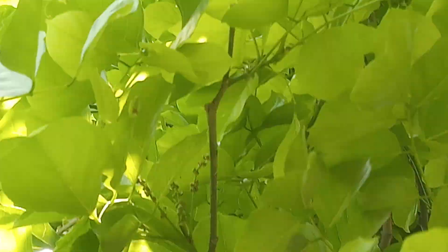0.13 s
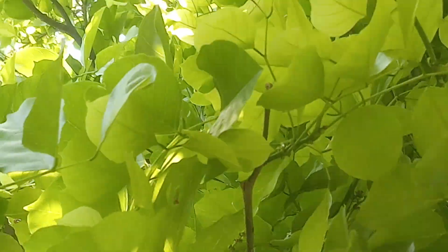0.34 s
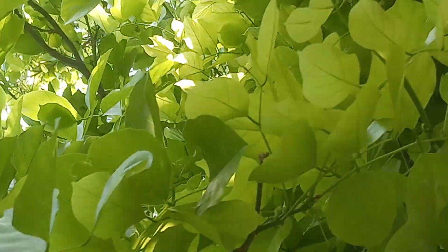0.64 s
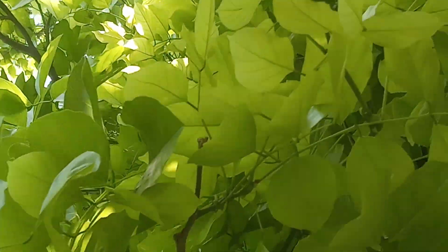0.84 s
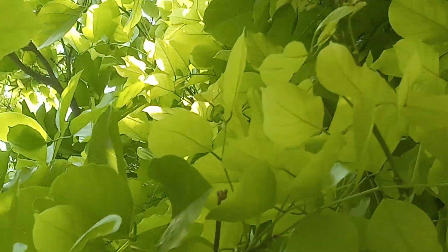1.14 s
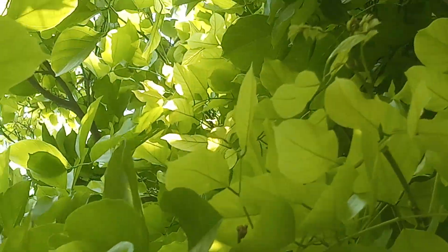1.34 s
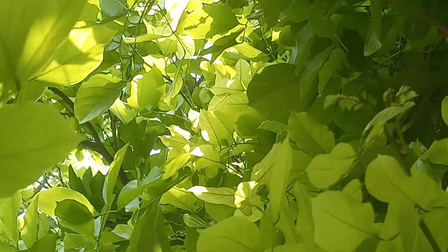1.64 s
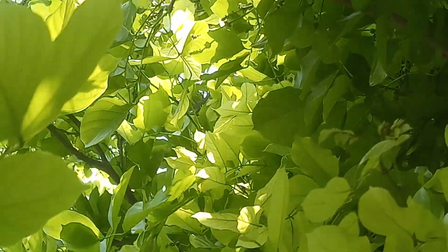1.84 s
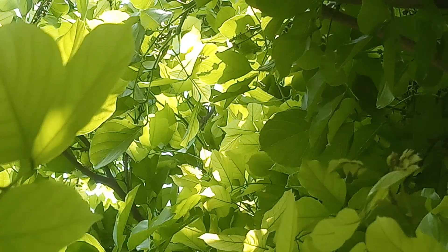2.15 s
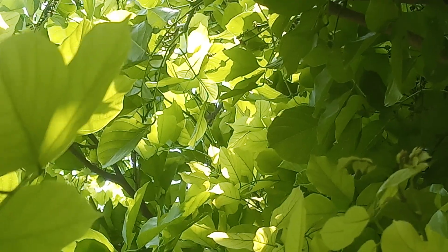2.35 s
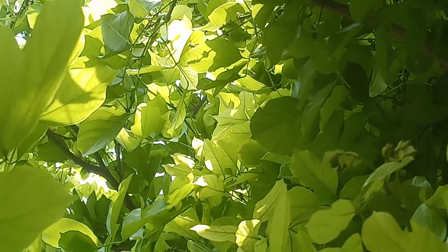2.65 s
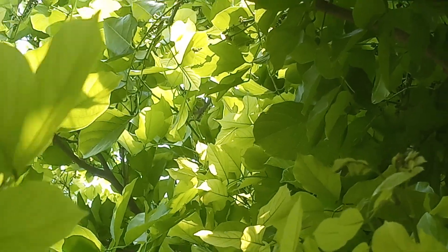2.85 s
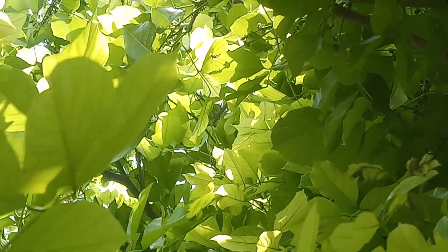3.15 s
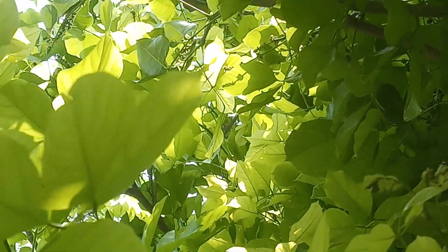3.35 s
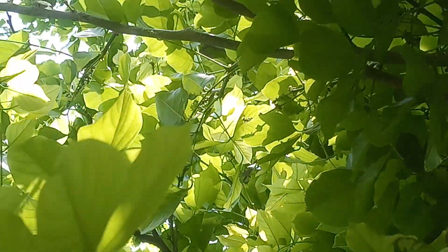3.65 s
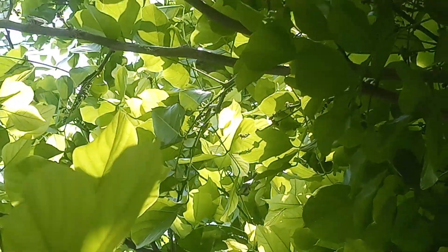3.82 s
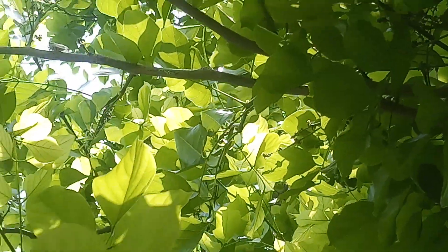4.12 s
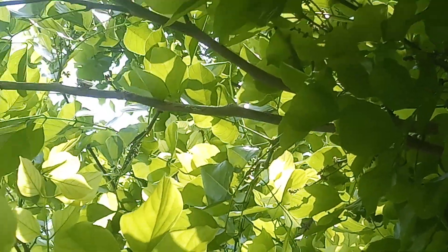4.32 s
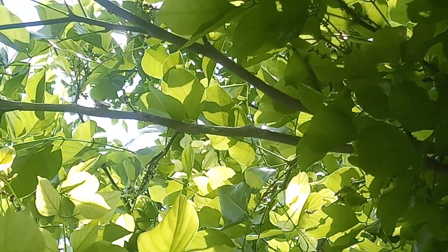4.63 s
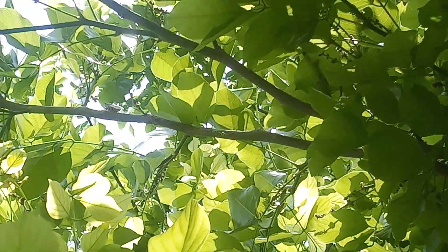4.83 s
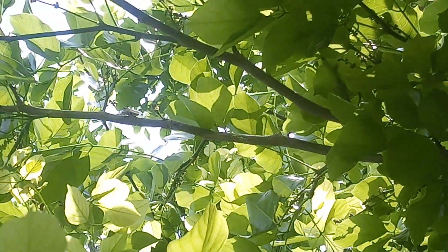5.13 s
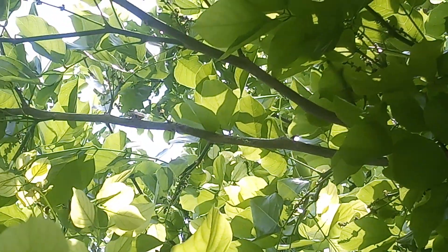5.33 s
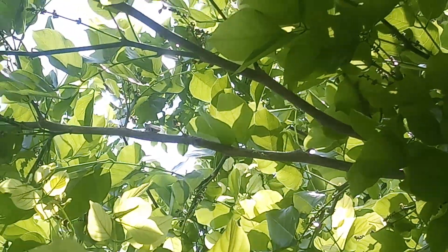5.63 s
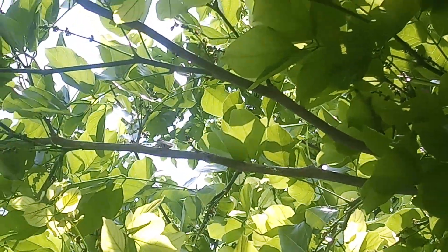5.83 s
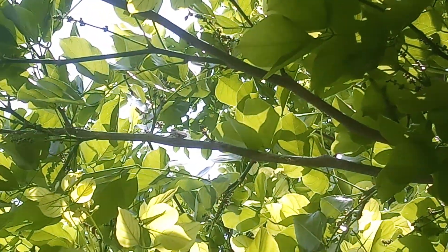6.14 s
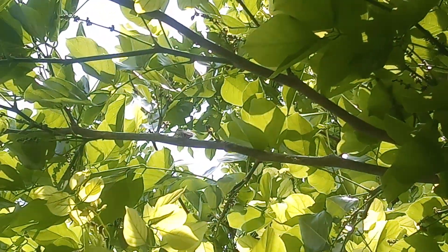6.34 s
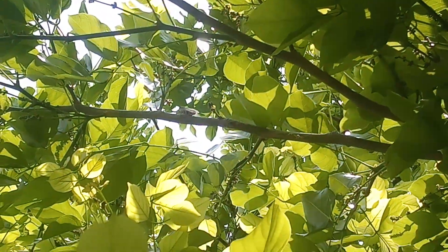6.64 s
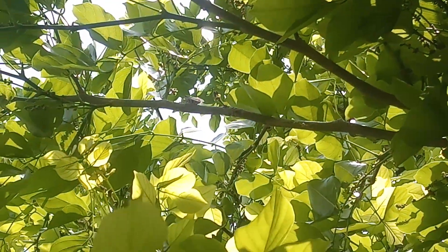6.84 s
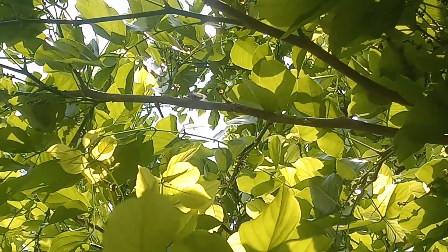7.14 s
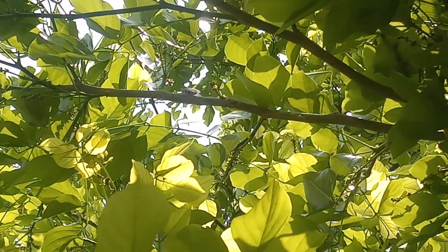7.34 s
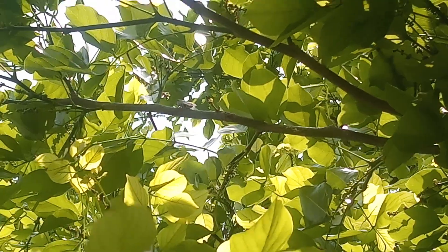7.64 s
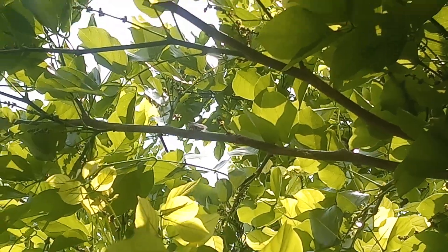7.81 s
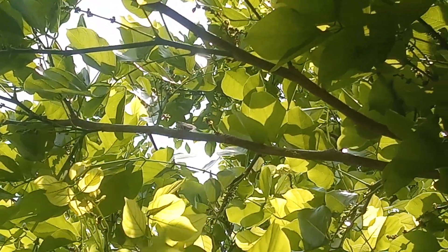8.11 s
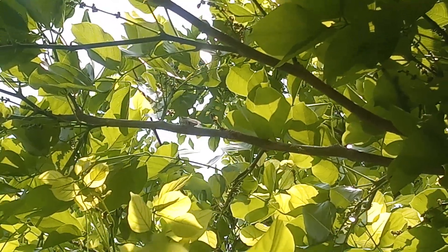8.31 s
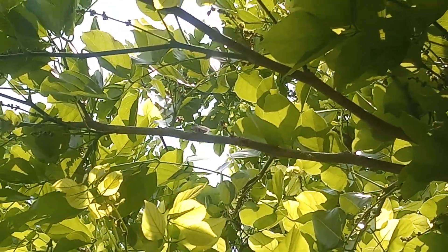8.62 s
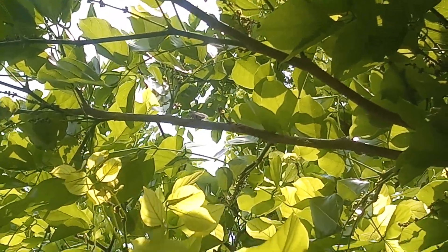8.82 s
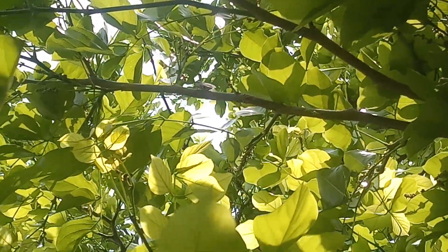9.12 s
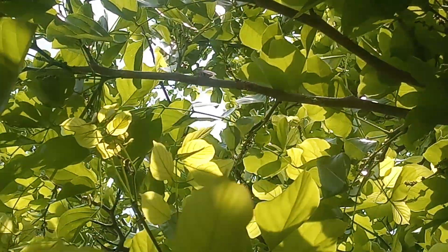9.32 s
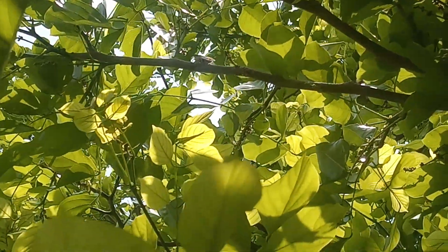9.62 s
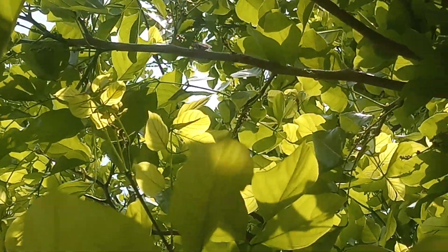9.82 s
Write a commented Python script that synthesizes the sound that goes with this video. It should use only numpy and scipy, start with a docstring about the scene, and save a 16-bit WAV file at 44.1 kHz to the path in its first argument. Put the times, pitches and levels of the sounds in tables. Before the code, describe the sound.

Steady, high-pitched cicada buzz from leafy branches overhead, with a few early gusts bumping the microphone and light ticking among the leaves.

```python
"""A shrill cicada drones in a leafy tree overhead, and early gusts buffet the microphone.
Its tymbals buckle about 208 times a second, a little faster in each surge of effort, and ring its hollow
abdomen. Leaves shade and scatter the sound; the treble opens as the hand-held camera turns to the crown.
Close by are dry ticks, snaps and handling knocks; far across the garden, a faint bird, tones and a hum."""
import sys
import numpy as np
from scipy import signal
from scipy.fft import rfft, irfft, next_fast_len
from scipy.io import wavfile
from scipy.ndimage import uniform_filter1d, map_coordinates

SR = 44100
rng = np.random.default_rng(int(sys.argv[2]) if len(sys.argv) > 2 else 0)


def dump(signal):
    """Clip the signal to [-1, 1] and save it as 16-bit WAV at the path in sys.argv[1]."""
    limited = np.clip(np.atleast_2d(signal).T, -1, 1)
    pcm = np.round(limited * 32767).astype(np.int16)
    wavfile.write(sys.argv[1], SR, pcm)


N = 439677
TIME = np.arange(N) / SR

# Levels are relative within each table.
# still garden air: f/Hz, level/dB
AIR_SPECTRUM = [(15, -57), (25, -28.5), (45, -10), (92, 2.5), (125, -6.5), (189, -2), (263, -7), (427, -6),
                (1600, -13), (2170, -13), (2540, -13), (2830, -11.5), (4800, -12), (6240, -5.5),
                (10600, -120)]
# soft swishes: t/s, hold/s, level/dB
SWISH_SWELLS = [(3.06, 0.49, -42), (3.7, 0.043, -40.5)]
# colour of a swish: f/Hz, level/dB
SWISH_SPECTRUM = [(100, -20), (230, -3.5), (350, -3), (500, -7), (800, -14), (1600, -34), (4000, -53)]
# faint far tones: t/s, length/s, start f/Hz, end f/Hz, level/dB
FAR_TONES = [(1.8, 0.19, 512, 535, -45), (2.42, 0.31, 509, 500, -49), (2.9, 0.28, 678, 680, -50),
             (3.08, 0.23, 335, 338, -45.5), (6.4, 0.27, 693, 695, -52), (8.35, 0.16, 437, 450, -47.5),
             (8.45, .45, 715, 755, -52)]
# a distant bird: t/s, length/s, start f/Hz, end f/Hz, level/dB
BIRD_CALLS = [(1.41, .13, 4240, 5170, -42), (1.69, 0.15, 4300, 5340, -39), (1.96, 0.2, 4300, 5430, -36),
              (2.12, 0.09, 2390, 2400, -38), (2.21, .13, 4260, 5300, -36), (2.45, 0.17, 4280, 5200, -40),
              (2.68, .12, 4380, 5160, -38)]
# pitches of the small crackle: f/Hz, level/dB
CRACKLE_PITCHES = [(1150, -8.5), (2200, -2.5), (2950, -1.5), (4000, -5.5)]
# loudness of the crackle: t/s, level/dB
CRACKLE_LEVEL = [(0, -46), (1.5, -49), (3.5, -46.5), (5.4, -49), (8.1, -47), (9.9, -52)]
# dry ticks among the leaves: t/s, level/dB, f/Hz
DRY_TICKS = [(0.5616, -25, 2920), (0.628, -25, 2620), (0.7607, -26, 4000), (0.922, -25, 2210),
             (1.25, -32, 2250), (1.72, -29.5, 2550), (2.283, -27, 3100), (2.6179, -30, 2800),
             (3.198, -28, 2830), (3.5495, -24, 2900), (3.9878, -32, 3060), (5.0203, -29.5, 3080),
             (5.1553, -30.5, 3110), (5.254, -24.5, 2520), (5.4291, -30, 3170), (5.692, -29, 2220),
             (5.8356, -30, 3180), (6.0296, -27.5, 2880), (6.223, -27, 2830), (6.364, -25, 2930),
             (6.543, -25, 3300), (6.6275, -23.5, 3430), (6.9631, -27, 2840), (7.046, -24, 2200),
             (7.393, -30, 3190), (7.9483, -26.5, 3020), (8.9054, -26.5, 2850), (9.138, -28, 3960),
             (9.1788, -28, 2300), (9.7058, -30, 3220)]
# sharp snaps: t/s, level/dB, low f/Hz, high f/Hz
SHARP_SNAPS = [(.563, -25, 2500, 6000), (1.251, -22, 1500, 13000), (2.262, -24, 11000, 14500),
               (6.366, -24, 2000, 5500), (6.628, -23, 2500, 5500), (7.449, -19, 4500, 14000),
               (9.178, -18.5, 1970, 6000), (9.362, -26, 4400, 5800)]
# handling noise at the microphone: t/s, level/dB
HANDLING_KNOCKS = [(4.812, -30), (5.254, -35), (7.38, -29), (7.45, -34), (7.949, -30), (9.794, -24.5),
                   (9.89, -27)]
# gusts on the microphone: t/s, hold/s, level/dB
GUST_SWELLS = [(-.01, .01, -26.5), (.18, 0.059, -28.5), (.44, .01, -36.5), (.65, .01, -33.5),
               (.77, 0.22, -17.5), (2.47, .01, -39), (2.69, .11, -32.5), (2.93, .03, -42.5),
               (3.27, .01, -41), (3.56, .01, -45)]
# colour of a gust, before wind strength shifts it down or up: f/Hz, level/dB
GUST_SPECTRUM = [(20, -44), (45, -12), (80, 3.5), (150, 1), (250, -13.5), (400, -27.5), (700, -65),
                 (1500, -81)]
# echo off a leaf beside the microphone, lost as the camera turns away: t/s, delay/ms, gain
LEAF_ECHO = [(0, 0.34, 0), (1, 0.34, 0.3), (1.8, 0.4, 0.15), (2.8, 0.4, 0.21), (3.6, 0.4, 0.12),
             (4.4, 0.45, 0)]
# treble as the camera turns to the crown: t/s, level/dB
TREBLE_LEVEL = [(0, -3), (1.2, 2.5), (3.3, -.5), (4.2, 1.5), (5, 2), (5.7, 1), (8.4, 0.5), (9.9, -1.5)]
# pitches that ring as reflections line up: start t/s, end t/s, f/Hz, width/Hz, lift/dB
RINGING_BANDS = [(-.7, 1.13, 8380, 170, 5.5), (1.3, 4.4, 8320, 70, 4), (2.5, 3.85, 7320, 100, 5.5),
                 (3.65, 3.1, 9050, 200, 4), (3.9, 4.9, 5830, 160, 4), (3, 5.2, 9400, 200, 3),
                 (4.5, 5.55, 7550, 150, 2.5), (6.1, 7.26, 7930, 80, 4.5), (6, 7.1, 8900, 203, 3),
                 (8, 9.5, 8500, 67, 6)]
# surges of effort in the tymbals: t/s, rise/s, extra rate/Hz
EFFORT_SURGES = [(-.2, .2, 1.3), (.85, .15, 1.6), (2.85, .14, 2.0), (4.75, .16, 1.6), (6.1, .22, 1.0),
                 (7.25, .1, 1.3), (7.95, .3, .4), (8.6, .12, .2)]
# partials the hollow abdomen radiates: multiple of the tymbal rate, level/dB
ABDOMEN_PARTIALS = [(25, -32.5), (26, -24.5), (27, -35), (28, -25), (29, -28), (30, -20), (31, -19),
                    (32, -22.5), (33, -11), (34, -9.5), (35, -3.5), (36, -4.5), (37, -3.5), (38, 0),
                    (39, -4), (40, -1), (41, -3.5), (42, -8), (43, -7), (44, -16), (45, -25.5), (46, -26),
                    (47, -20.5), (48, -18), (49, -31), (50, -21), (51, -24.5), (52, -25.5), (53, -25.5),
                    (54, -28.5)]
# rasp of the ribs: f/Hz, level/dB
RASP_SPECTRUM = [(3500, -35.5), (5000, -17), (6300, -28), (7200, -3), (8500, -13.5), (9300, -3.5),
                 (10800, -20), (12300, -21.5), (15600, -21)]
# clicks above the main song: f/Hz, level/dB
SHEEN_SPECTRUM = [(9000, -20.5), (10900, -0.5), (11450, -4), (11800, 3), (12050, 4), (12350, -10),
                  (13100, -15), (13700, -16), (14300, -1.5), (14700, 3.5), (15000, -12), (15400, -1),
                  (16000, -1)]
# the song at the microphone: t/s, level/dB
SONG_LEVEL = [(0.0, -15), (0.36, -13.5), (0.66, -15.5), (0.79, -14), (1.02, -16), (1.62, -14.5),
              (2.01, -15.5), (2.34, -13.5), (2.64, -15), (3.38, -12.5), (4.46, -14.5), (4.98, -12),
              (5.01, -13.5), (6.11, -14.5), (6.35, -13), (7.07, -12.5), (7.24, -14.5), (7.92, -12.5),
              (9.71, -14), (9.88, -13)]


def amp(db):
    """Decibels to gain."""
    return 10 ** (np.asarray(db) / 20)


def unit_rms(x):
    """Scales to rms 1."""
    return x / np.sqrt(np.mean(x ** 2) + 1e-20)


def curve(rows):
    """Joins (t/s, value) rows by straight lines."""
    return np.interp(TIME, *np.transpose(rows))


def colour(x, spectrum):
    """Filters by (f/Hz, level/dB) rows; rms 1."""
    size = next_fast_len(N)
    hz, db = np.transpose(spectrum)
    gain = amp(np.interp(np.log(np.fft.rfftfreq(size, 1 / SR) + 1), np.log(hz), db))
    return unit_rms(irfft(rfft(x, size) * gain, size)[:N])


def wander(low_hz, high_hz, step=32):
    """Random drift between two rates; rms 1."""
    band = signal.butter(2, [low_hz, high_hz], "band", fs=SR / step, output="sos")
    slow = signal.sosfilt(band, rng.standard_normal(N // step + 1))
    return unit_rms(np.interp(TIME, TIME[::step], slow))


def add(mix, start_s, sound):
    """Mixes a sound in at start_s."""
    part = mix[max(round(start_s * SR), 0):][:len(sound)]
    part += sound[:len(part)]


def swells(rows, attack_s, fall_db_per_s):
    """Each (t/s, hold/s, level/dB) row rises, holds and dies away."""
    level = np.zeros(N)
    for start, hold, db in rows:
        falling_s = np.maximum(TIME - start - attack_s - hold, 0)
        level += np.clip((TIME - start) / attack_s, 0, 1) * amp(db - fall_db_per_s * falling_s)
    return level


def foliage(x, t60):
    """Countless small echoes off leaves and branches, falling 60 dB in t60 seconds."""
    t = TIME[:SR // 2]
    echoes = rng.standard_normal(len(t)) * amp(-60 * t / t60) * (t > .003)
    padded = np.concatenate([x[:len(t)][::-1], x])  # echoes are already sounding at the start
    return signal.fftconvolve(padded, echoes / np.linalg.norm(echoes))[len(t):][:N]


def garden(air_db=-42, hum_db=-57, swish_db=-2, patchy_db=2.5, smooth_below_hz=900):
    """The ambience: quiet air in drifting patches, a far wavering hum and two soft swishes."""
    noise = signal.stft(rng.standard_normal(N), nperseg=2048)[2]
    patches = uniform_filter1d(rng.standard_normal(noise.shape), size=5, axis=0)
    patches = unit_rms(uniform_filter1d(patches, size=6, axis=1))
    depth_db = patchy_db * np.clip(np.linspace(0, SR / 2, len(noise)) / smooth_below_hz, .3, 1)
    wash = signal.istft(noise * amp(depth_db[:, None] * patches))[1][:N]
    air = amp(air_db) * colour(wash, AIR_SPECTRUM)
    hum_level = amp(hum_db) * (1 + .5 * wander(.87, 7.3))
    hum = hum_level * np.sin(2 * np.pi * 100 * TIME + wander(.29, 4.8))
    swish_level = amp(swish_db) * swells(SWISH_SWELLS, attack_s=.035, fall_db_per_s=25.5)
    return air + hum + swish_level * colour(rng.standard_normal(N), SWISH_SPECTRUM)


def far_calls(rows, blur, gain_db):
    """Distant gliding tones, heard through the trees; the wider the glide, the less steady the pitch."""
    out = np.zeros(N)
    unsteady = wander(18.5, 220)
    for start, length, start_hz, end_hz, db in rows:
        hz = np.linspace(start_hz, end_hz, round(length * SR))
        hz += blur * (abs(end_hz - start_hz) + 200) * unsteady[round(start * SR):][:len(hz)]
        tone = np.sin(2 * np.pi * np.cumsum(hz) / SR)
        add(out, start, amp(db) * signal.windows.tukey(len(hz), .5) * tone)
    return amp(gain_db) * (out + foliage(out, t60=.46))


def tick(hz, rise_s=.00098, grit_gain=.55, grit_t60=.074):
    """One dry tick: a ring of a few milliseconds and a broad burst of grit."""
    t = TIME[:2000]
    ring = t / rise_s * np.exp(1 - t / rise_s) * np.sin(2 * np.pi * hz * t)
    band = signal.butter(1, [hz * .75, hz * 1.4], "band", fs=SR)
    grit = unit_rms(signal.lfilter(*band, rng.standard_normal(len(t))))
    return ring + grit_gain * grit * amp(-60 * t / grit_t60)


def crackle(base_per_s=45, spread_db=3, clump=.7, detune=.087, count=6):
    """A faint bed of tiny ticks, in clumps, around a few pitches."""
    chance = base_per_s / count / SR * np.exp(clump * wander(1.5, 14))
    out = np.zeros(N)
    for hz, db in CRACKLE_PITCHES:
        layer = np.zeros(N)
        for shift in np.linspace(-detune, detune, count):
            starts = np.flatnonzero(rng.random(N) < chance) / SR
            grain = tick(hz * (1 + shift), rise_s=.0012 * rng.uniform(.51, 1.67), grit_gain=.36)
            sizes = np.minimum(rng.exponential(1, 2000), 3.5)
            for start, size in zip(starts, sizes):
                add(layer, start, amp(spread_db * size) * grain)
        out += amp(db) * unit_rms(layer)
    return amp(curve(CRACKLE_LEVEL)) * out


def ticks(gain_db=-3):
    """The clearest ticks among the leaves."""
    out = np.zeros(N)
    for start, db, hz in DRY_TICKS:
        add(out, start, amp(db + gain_db) * tick(hz))
    return out


def snaps(gain_db=-2, t60=.04):
    """Bright, broad cracks that die at once."""
    out, t = np.zeros(N), TIME[:SR // 10]
    for start, db, low_hz, high_hz in SHARP_SNAPS:
        band = signal.butter(3, [low_hz, high_hz], "band", fs=SR, output="sos")
        burst = signal.sosfilt(band, rng.standard_normal(len(t)) * amp(-60 * t / t60))
        add(out, start, amp(db + gain_db) * burst / abs(burst).max())
    return out


def handling(t60=.091, cutoff_hz=1300):
    """The hand on the camera: dull knocks with no ring, right at the microphone."""
    out, t = np.zeros(N), TIME[:SR // 10]
    lowpass = signal.butter(1, cutoff_hz, fs=SR)
    for start, db in HANDLING_KNOCKS:
        burst = signal.lfilter(*lowpass, rng.standard_normal(len(t))) * amp(-60 * t / t60)
        add(out, start, amp(db) * burst / abs(burst).max())
    return out


def wind(gain_db=-1, lump_db=3, bright_above_db=-22, soft_shift=.79, hard_shift=1.62):
    """Lumpy turbulence on the microphone; harder gusts make smaller eddies that reach higher in pitch."""
    level = swells(GUST_SWELLS, attack_s=.055, fall_db_per_s=84)
    eddies = rng.standard_normal(N) * amp(lump_db * wander(8.5, 39))
    hardness = level / (level + amp(bright_above_db))
    coarse = colour(eddies, [(hz * soft_shift, db) for hz, db in GUST_SPECTRUM])
    fine = colour(eddies, [(hz * hard_shift, db) for hz, db in GUST_SPECTRUM])
    buffet = (1 - hardness) * coarse + hardness * fine
    return amp(gain_db) * level * buffet / np.sqrt(uniform_filter1d(buffet ** 2, size=3000))


def near_leaves(x, echo_gain=.62, spacing_s=.0013, drift=.119, count=3):
    """Echoes off close leaves make a comb, which drifts with their delays as the camera moves."""
    out = x.copy()
    for k in range(count):
        delay_s = spacing_s * (1 + k + drift * wander(.028, .194))
        out += (-1) ** k * echo_gain * np.interp(TIME - delay_s, TIME, x)
    return unit_rms(out)


def moving_foliage(x, t60, changes_per_s=.4515, count=3):
    """One pattern of leaf echoes fades into the next as the microphone moves."""
    weights = (np.cos(np.pi * (changes_per_s * TIME + k / count)) for k in range(count))
    return unit_rms(sum(weight * foliage(x, t60) for weight in weights))


def camera_turn(x, treble_hz=9300):
    """Turning to the crown: a close leaf's echo sweeps a comb through the song, and the treble opens."""
    times, delay_ms, gain = np.transpose(LEAF_ECHO)
    delayed_time = TIME - np.interp(TIME, times, delay_ms) / 1000
    combed = x + np.interp(TIME, times, gain) * map_coordinates(x, [delayed_time * SR], order=3)
    treble = signal.sosfiltfilt(signal.butter(4, treble_hz, "high", fs=SR, output="sos"), combed)
    return combed + (amp(curve(TREBLE_LEVEL)) - 1) * treble


def ringing_reflections(x):
    """As reflections line up at the microphone, narrow bands swell out of the song and sink back."""
    size = next_fast_len(N)
    spectrum, hz = rfft(x, size), np.fft.rfftfreq(size, 1 / SR)
    out = x.copy()
    for start, end, centre_hz, width_hz, lift_db in RINGING_BANDS:
        band = irfft(spectrum * np.exp(-((hz - centre_hz) / width_hz) ** 2), size)[:N]
        progress = np.clip((TIME - start) / (end - start), 0, 1)
        out += (amp(lift_db * np.sin(np.pi * progress)) - 1) * band
    return out


def tymbal_rate(rest_hz=207.3, hold_s=.2, ebb_s=.55):
    """Cycles per second: each surge of effort speeds the tymbals up, holds, then ebbs towards rest."""
    hz = np.full(N, rest_hz)
    for start, rise, extra_hz in EFFORT_SURGES:
        ebb = np.exp(-np.maximum(TIME - start - rise - hold_s, 0) / ebb_s)
        hz += extra_hz * np.clip((TIME - start) / rise, 0, 1) * ebb
    return hz


def tymbal_tone(cycles, drift_cycles=.035, fade_db=1.23):
    """Partials of the rib clicks; each fades and shifts slowly as the paths through the leaves change."""
    t = TIME[::441]
    # two tymbals take turns, with weaker clicks from their other ribs
    click_gain = np.array([.88, .83, .49, .5, .54])[:, None]
    slips = np.array([np.interp(t, TIME, wander(.0499, .3)) for _ in click_gain])
    place_in_cycle = np.array([0, .52, .2, .36, .7])[:, None] + drift_cycles * slips
    knots = np.linspace(0, t[-1], 14)
    tone, phase = np.zeros(N), 2 * np.pi * (cycles % 1)
    for k, db in ABDOMEN_PARTIALS:
        fading = np.interp(t, knots, rng.standard_normal(len(knots)))
        gain = amp(db + fade_db * (fading - fading.mean()))
        click_sum = (click_gain * np.exp(-2j * np.pi * k * place_in_cycle)).sum(0)
        shift = np.unwrap(np.angle(click_sum))
        tone += np.interp(TIME, t, gain) * np.cos(k * phase + np.interp(TIME, t, shift))
    return unit_rms(tone)


def cicada(jitter_hz=1, rasp_db=-18, sheen_db=-25, scatter_db=-5, flutter_db=-.14, waver_db=.38):
    """Up in the tree, uneven tymbal strokes ring the abdomen and rasp; the leaves scatter the song."""
    cycles = np.cumsum(tymbal_rate() + jitter_hz * wander(4.93, 78)) / SR
    strokes = 1 + .4 * np.cos(4 * np.pi * cycles)  # two to a cycle
    rasp = colour(near_leaves(strokes * rng.standard_normal(N)), RASP_SPECTRUM)
    clicks = np.sinc(160 * (cycles % 1 - .25)) + .5 * np.sinc(160 * (cycles % 1 - .77))
    sheen = colour(.56 * clicks + foliage(clicks, t60=.033), SHEEN_SPECTRUM)
    direct = tymbal_tone(cycles) + amp(rasp_db) * rasp + amp(sheen_db) * sheen
    direct *= amp(flutter_db * wander(6.3, 60))
    scattered = amp(scatter_db) * moving_foliage(direct, t60=.17)
    song = ringing_reflections(camera_turn(direct + scattered))
    steady = song / np.sqrt(uniform_filter1d(song ** 2, size=7000))
    return steady * amp(curve(SONG_LEVEL) + waver_db * wander(2.1, 8.6))


def scene():
    """One microphone under the tree, the same in both channels."""
    bird = far_calls(BIRD_CALLS, blur=.15, gain_db=-6)
    tones = far_calls(FAR_TONES, blur=.2, gain_db=-1)
    mono = cicada() + wind() + garden() + ticks() + crackle() + snaps() + handling() + bird + tones
    return np.array([mono, mono])


def record(dry, stop_s=9.925, fade_s=.01, cutoff_hz=15720):
    """The recorder cuts the highest treble and stops just before the end."""
    running = np.clip((stop_s - TIME) / fade_s + .5, 0, 1)
    lowpass = signal.firwin(1023, cutoff_hz, window=("kaiser", 9), fs=SR)
    return signal.oaconvolve(dry * running, lowpass[None], "same")


dry = scene()
out = record(dry)
dump(out)
```